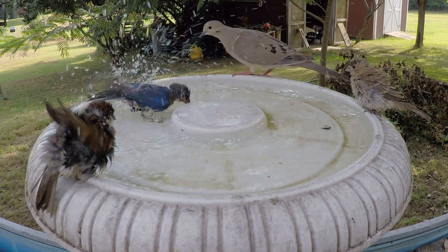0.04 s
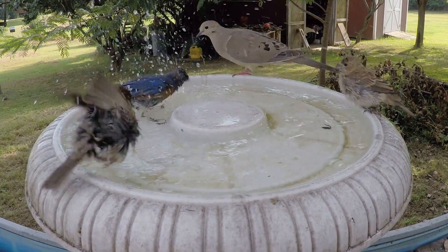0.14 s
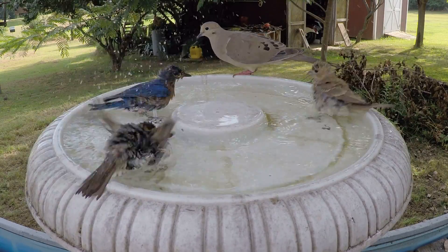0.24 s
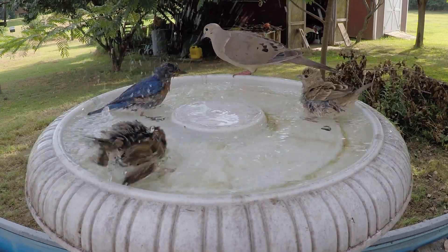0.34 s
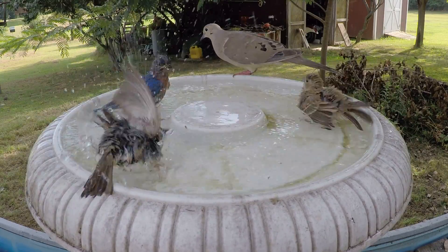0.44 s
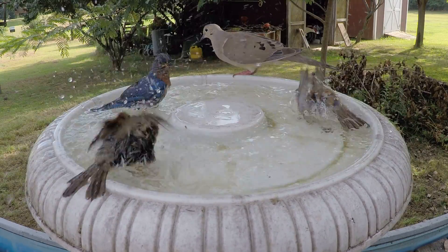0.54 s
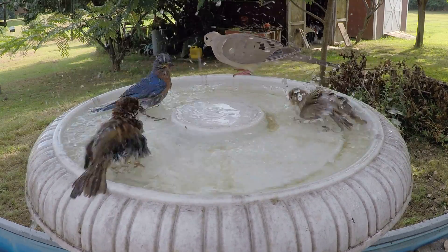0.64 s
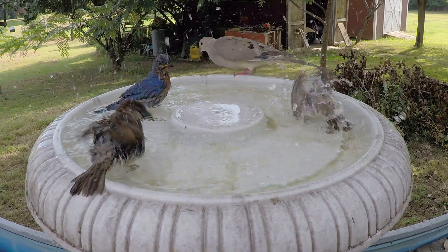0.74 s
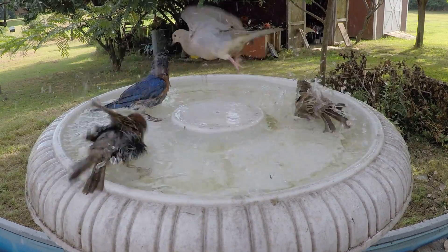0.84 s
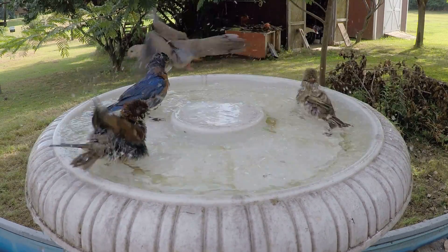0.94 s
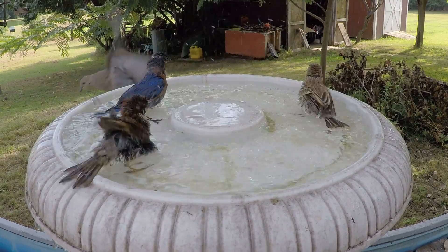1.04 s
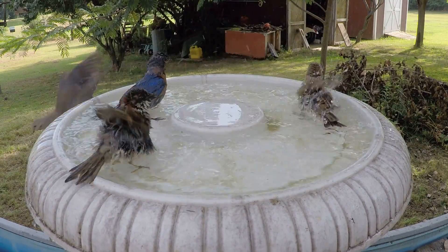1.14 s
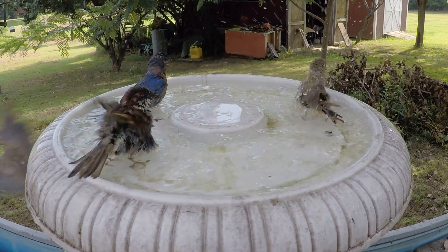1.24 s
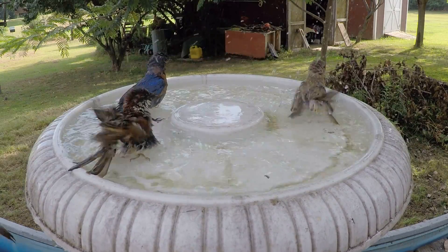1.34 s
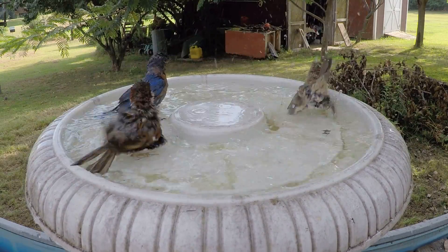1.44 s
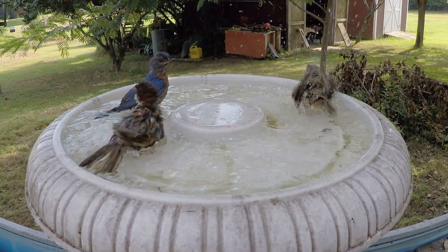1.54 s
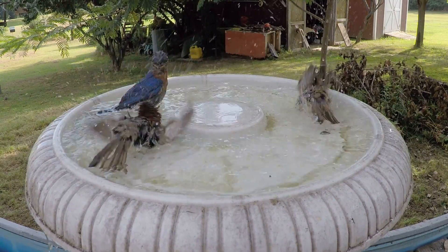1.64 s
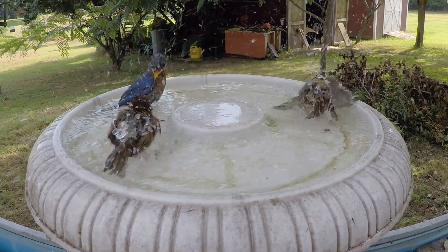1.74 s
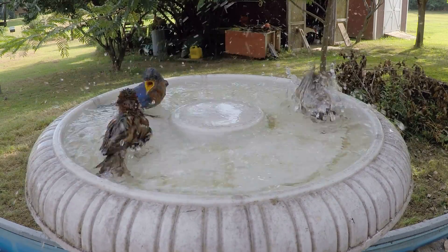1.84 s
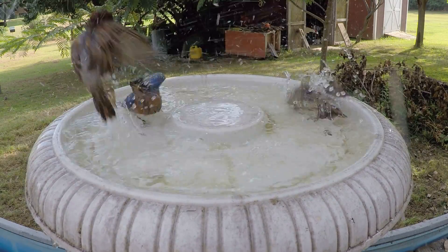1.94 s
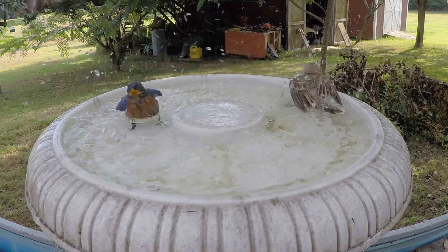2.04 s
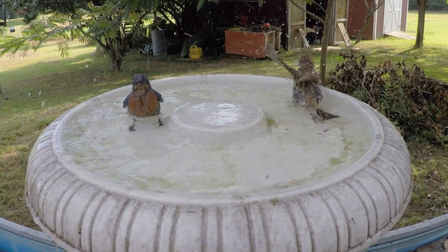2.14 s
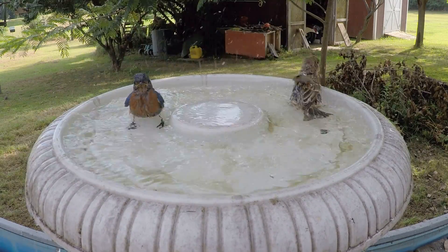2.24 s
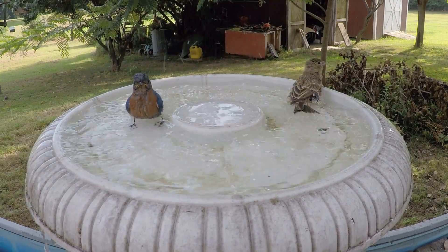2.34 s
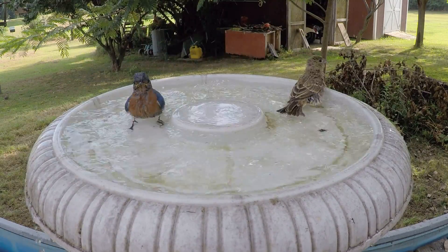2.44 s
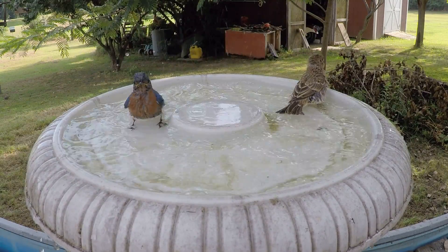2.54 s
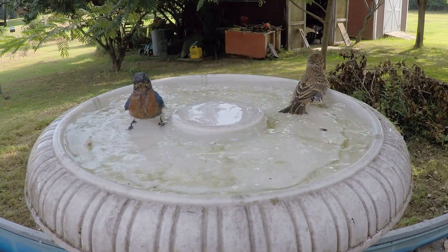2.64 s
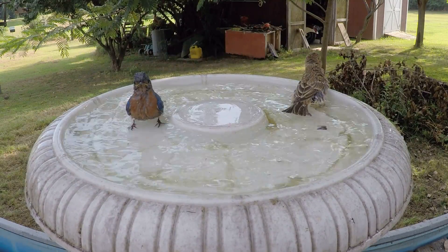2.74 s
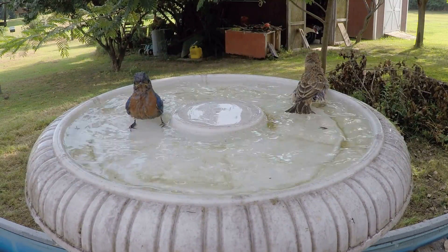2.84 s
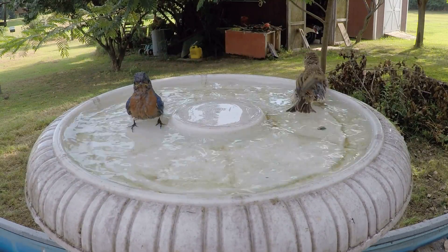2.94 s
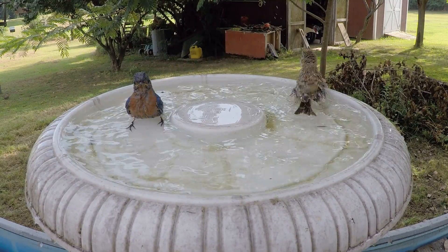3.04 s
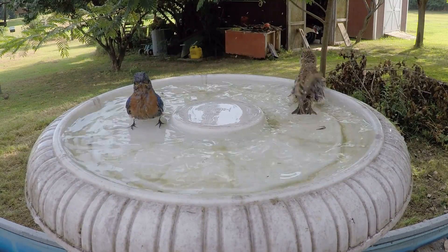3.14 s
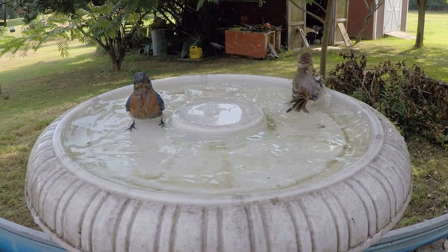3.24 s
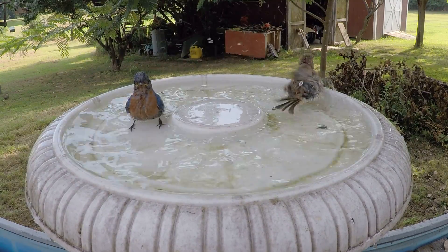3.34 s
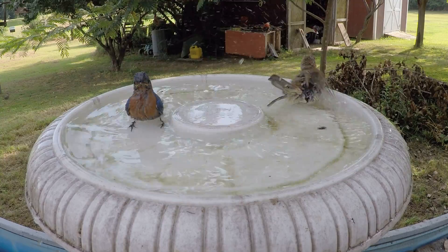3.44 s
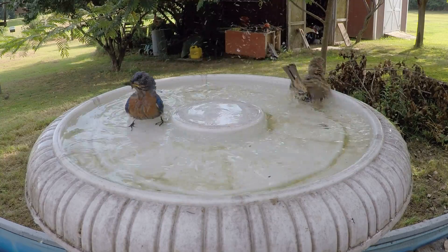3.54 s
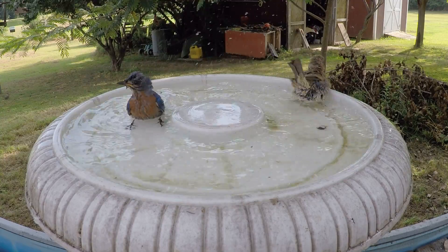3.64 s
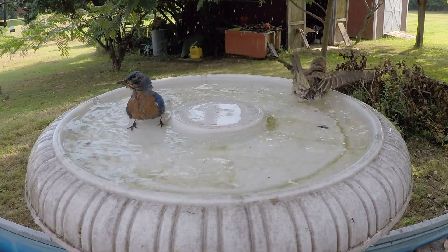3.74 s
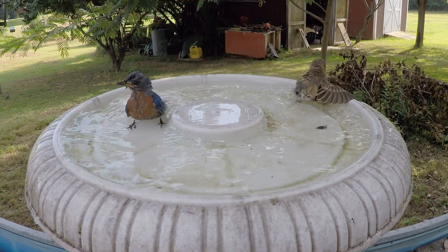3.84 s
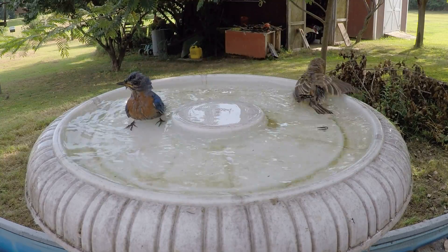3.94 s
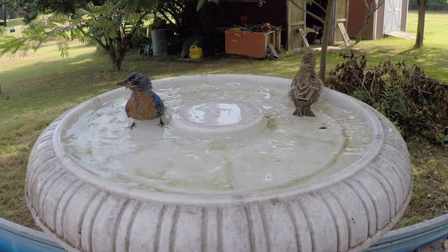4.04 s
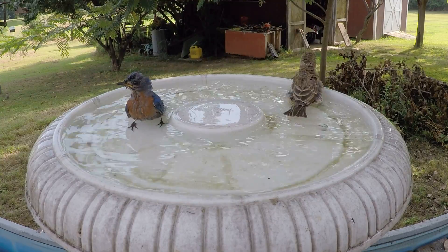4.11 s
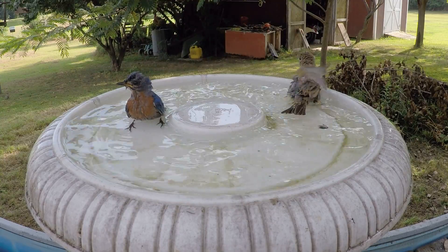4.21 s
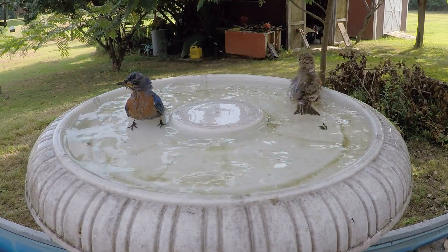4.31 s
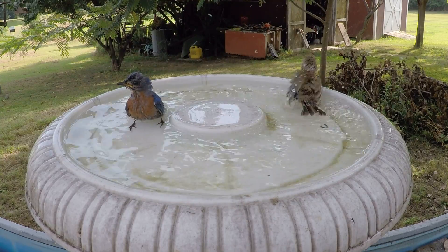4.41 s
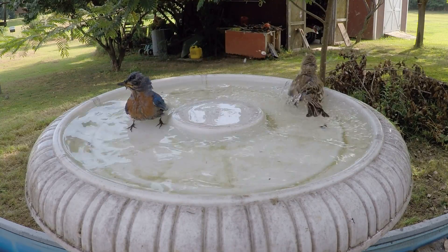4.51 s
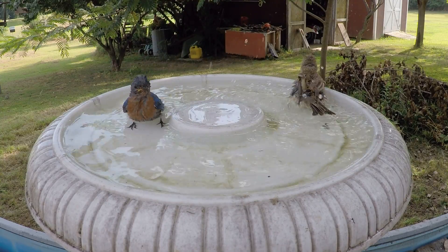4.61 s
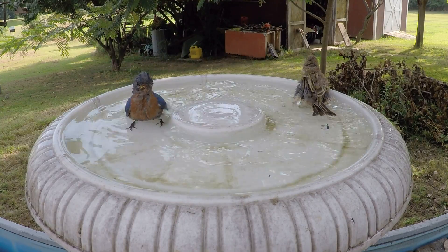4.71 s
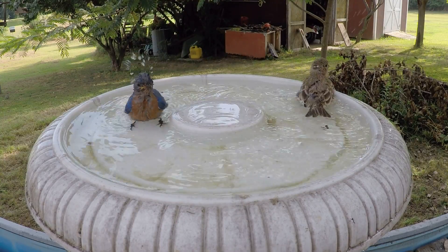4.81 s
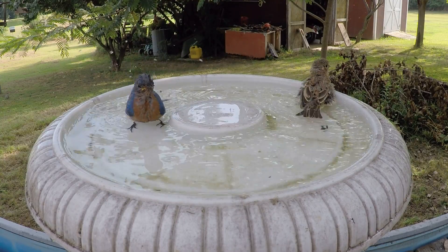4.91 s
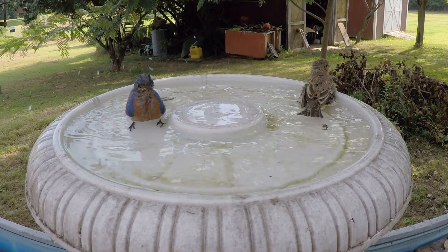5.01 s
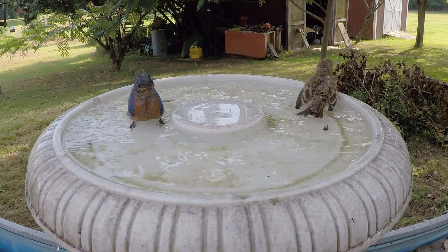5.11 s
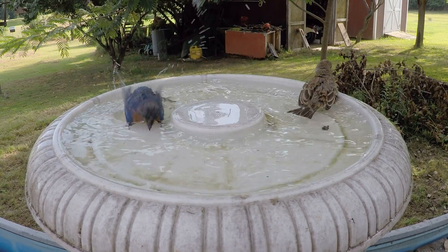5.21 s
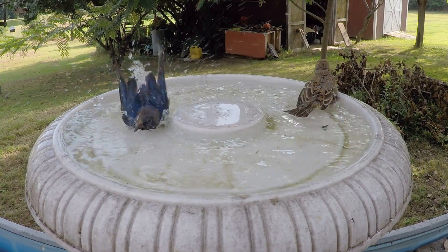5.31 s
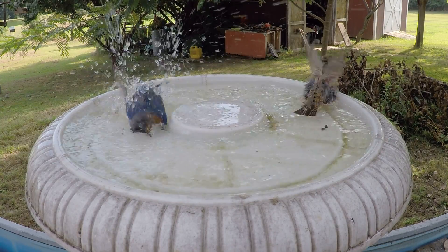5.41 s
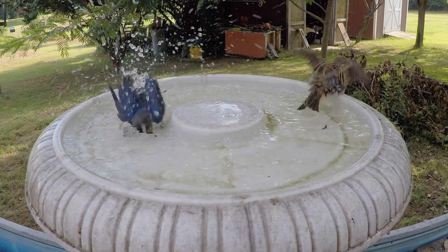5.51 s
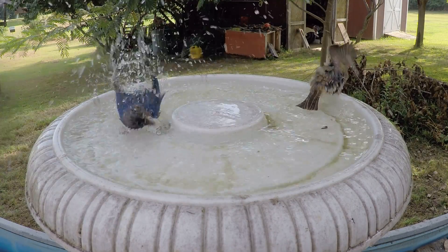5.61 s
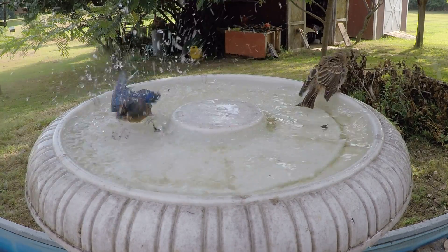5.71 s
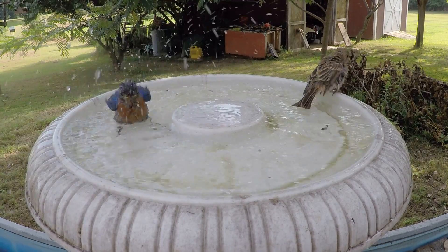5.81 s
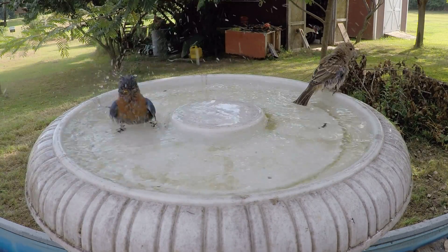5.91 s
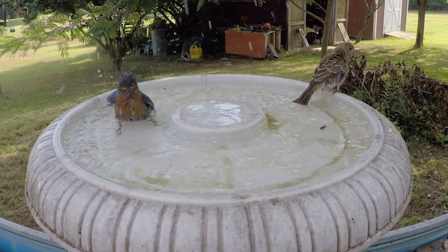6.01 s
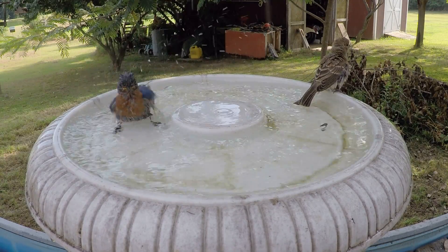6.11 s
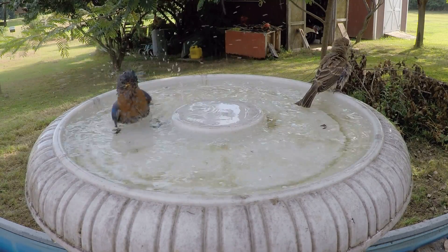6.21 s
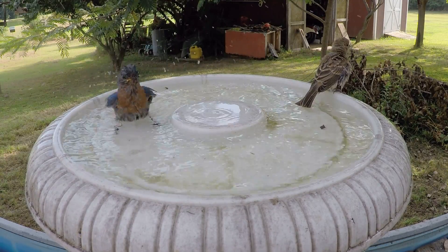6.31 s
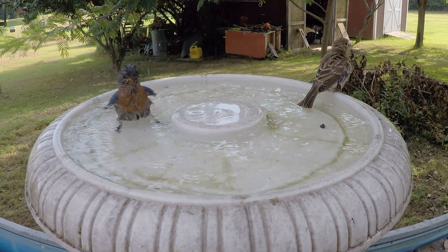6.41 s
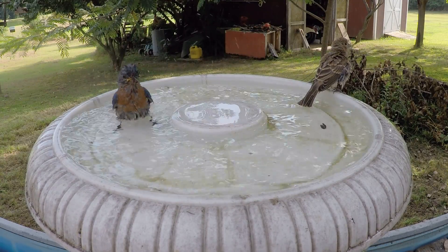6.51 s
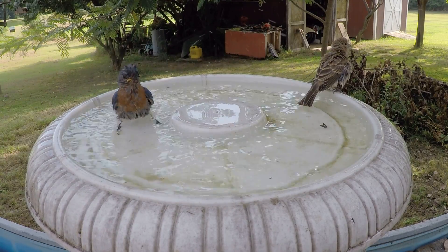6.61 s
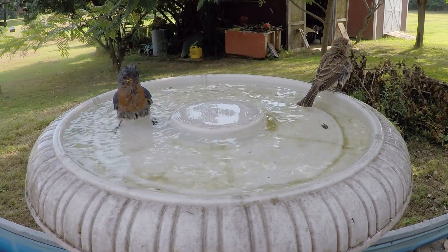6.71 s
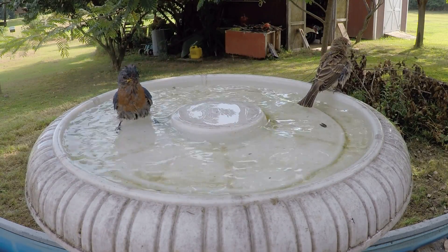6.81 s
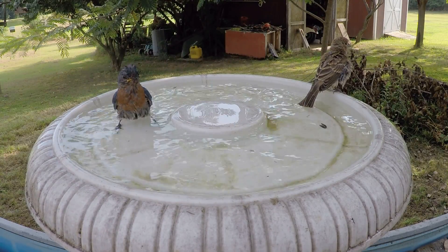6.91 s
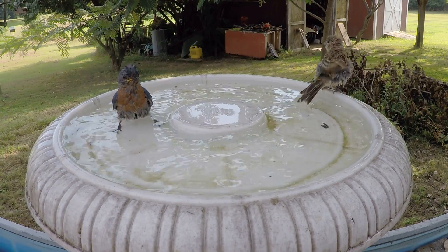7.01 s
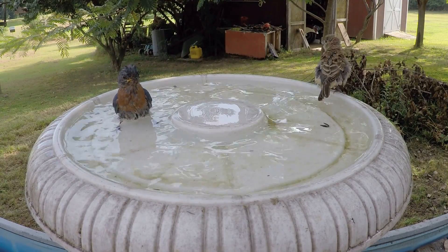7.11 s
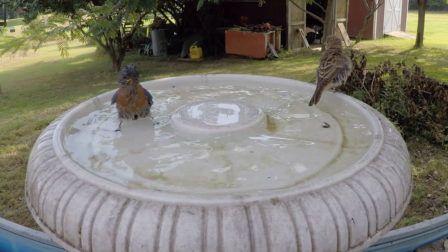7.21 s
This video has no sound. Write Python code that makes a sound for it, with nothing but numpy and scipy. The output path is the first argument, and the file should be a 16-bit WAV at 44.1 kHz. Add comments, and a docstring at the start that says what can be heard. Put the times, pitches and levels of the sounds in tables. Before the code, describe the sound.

Close by a shallow bird bath outdoors, small birds flap in bursts. Drops pelt the microphone housing with hollow knocks and sharp ticks in the first half-second, softer pattering and wing slaps follow, with brisk slaps around two seconds. A quieter middle gives way to another dense splash near five and a half seconds, then stray drips. Low rumble, a soft regular thump, faint hiss and distant chirps lie beneath.

```python
"""Garden bird bath, shallow: small birds bathe, wings slapping and pattering in the water.
Flung drops and mist excite damped modes of the microphone's hollow housing at the rim.
Slaps and falling spray excite basin modes; bubbles are decaying sines that rise in pitch.
Far birds chirp as gliding sines. Shaped-noise rumble and hiss, a wavering drone and a
soft, clock-steady pulse throb with strays lie beneath."""
import sys
import numpy as np
from scipy import signal
from scipy.fft import rfft, irfft
from scipy.io import wavfile

SR = 44100
rng = np.random.default_rng(int(sys.argv[2]) if len(sys.argv) > 2 else 0)


def put_to_file(sound):
    """Save the sound as 16-bit audio at rate SR, in the file named by the first command-line argument."""
    columns = np.atleast_2d(sound).T  # one column per channel
    safe = np.clip(columns, -1, 1)
    whole_steps = np.round(safe * 32767)
    wavfile.write(sys.argv[1], SR, whole_steps.astype(np.int16))


N = 320166
TIME_S = np.arange(N) / SR

# Garden rumble and hiss spectra, relative: freq_hz, density_db_per_hz
RUMBLE_SPECTRUM = [(12, -23), (22, -3.5), (44, 0), (70, -5.5), (110, -13), (160, -18.5), (250, -23),
                   (400, -28), (700, -49), (1500, -53.5)]
HISS_SPECTRUM = [(260, -37), (450, -2.5), (702, -2), (756, -3.5), (958, -4.5), (1780, -7), (2330, -5),
                 (2910, -8), (3630, -5), (4740, -10.5), (5500, -7.5), (6010, -11), (7180, -13.5),
                 (13200, -18), (15500, -23)]
# Low drone swells, before trim and flutter: centre_s, level_db, gaussian_sigma_s
DRONE_SWELLS = [(.05, -62, 0.25), (.54, -54.5, .06), (1.56, -59.5, 0.15), (1.87, -54.5, 0.05),
                (2.38, -55, 0.22), (5.7, -58, 0.16)]
DRONE_REST_DB = -67   # before trim and flutter
THROB_FIRST_S, THROB_PERIOD_S = .0397, .102385
# Far bird chirps: start_s, length_s, start_hz, end_hz, mid_rms_db, buzz_rms_hz
CHIRPS = [(0.925, 0.093, 3200, 3320, -67, 70), (2.43, 0.12, 7400, 7550, -75, 150),
          (2.56, .13, 8550, 8650, -79, 100), (3.437, .07, 7150, 7850, -70, 300),
          (3.851, .16, 3250, 3090, -73, 50), (4.021, 0.14, 2780, 2730, -74, 50),
          (4.2, .12, 2230, 2180, -75, 50), (4.298, .11, 7350, 7160, -74, 300),
          (4.343, 0.0506, 3890, 3350, -65.5, 150), (5.045, 0.057, 7600, 7460, -72, 400),
          (5.179, 0.018, 3450, 3570, -58, 50)]
# Bubbles ringing in the water: start_s, start_hz, peak_db, t60_s
BUBBLES = [(1.072, 910, -51.5, 0.039), (1.218, 1810, -48, 0.12), (1.947, 2070, -43, 0.02),
           (2.41, 1850, -49, 0.058), (2.747, 1610, -40, 0.025), (3.373, 4100, -45, 0.022),
           (6.208, 1690, -46.5, 0.037), (6.75, 2030, -51, 0.018)]
# Wing flutter bouts, levels before trim: start_s, length_s, patter_db, mist_db
FLUTTERS = [(.09, 0.031, -62, -72.5), (0.304, 0.047, -69, -62), (0.498, 0.098, -60, -49),
            (.62, 0.036, -64, -57), (0.75, 1.42, -66.5, -75.5), (2.037, 0.023, -56, -62),
            (2.146, 0.67, -66.5, -69), (3.374, .06, -64.5, -81), (4.35, 0.13, -71, -85),
            (5.22, 0.31, -69.5, -82), (5.489, 0.041, -68, -60.5), (5.596, 0.022, -64, -53),
            (5.668, 0.087, -63, -53), (5.86, 0.093, -73, -60.5), (6.08, 0.13, -67.5, -66.5),
            (6.407, .05, -76, -61), (6.685, .06, -86, -63)]
PATTER_RISE_DB_PER_S, PATTER_FALL_DB_PER_S = 115, 84
MIST_RISE_DB_PER_S, MIST_FALL_DB_PER_S = 258, 260
# Wing slaps and drops in the basin, before trim: start_s, peak_db
SLAPS = [(0.8668, -40), (1.1415, -47), (1.149, -43), (1.2754, -41), (1.2827, -40), (1.367, -45),
         (1.4175, -40.5), (1.467, -45), (1.5186, -44.5), (1.6108, -44), (1.6575, -41.5), (1.998, -30.5),
         (2.0132, -46), (2.0345, -45), (2.0604, -27), (2.1524, -28), (2.6127, -48), (2.63, -42),
         (3.3738, -44.5), (3.554, -45), (4.4742, -51), (4.523, -47)]
# Basin splash resonances, nominal strength: freq_hz, level_db, t60_s
BASIN_MODES = [(750, -21, 0.037), (1690, -9, 0.0062), (2070, -12.5, 0.04), (2410, 0.5, 0.015),
               (2630, -2, 0.0077), (3430, 4.5, 0.0076), (3966, -3, 0.015), (4514, -6, 0.013),
               (5630, -10, 0.019), (6300, -8, 0.0075), (7450, -21.5, 0.0068)]
# Housing modes, nominal strength: freq_hz, level_db, t60_s
HOUSING_MODES = [(464, -17, 0.029), (554, -11, 0.072), (645, -11.5, 0.073), (748, -7, 0.048),
                 (958, -1, 0.024), (1073, -2.5, 0.017), (1224, -2, 0.018), (1366, -5.5, 0.026),
                 (1542, 0, 0.018), (1742, 1, 0.015), (1894, -0.5, 0.028), (2090, -2.5, 0.034),
                 (2200, -6.5, 0.018), (2500, -0.5, 0.012), (2884, -7.5, 0.036), (3354, 3, 0.011),
                 (4050, 0.5, 0.015), (4410, -8, 0.034), (4760, -7, 0.014), (5330, -4.5, 0.0054),
                 (5760, -5, 0.0086), (6440, -6, 0.0072), (7200, -4, 0.0085), (8830, -6, 0.0042),
                 (9800, 0, 0.0037), (10800, 1, 0.0047), (13000, 1, 0.0016)]
# Bounds of the knock, ring, click and spit registers: edge_hz
REGISTER_EDGES_HZ = [400, 1650, 2700, 7000, 16000]
# Drops on the housing: start_s, splat_ms (before offset and stretch), ring_db (rms over 10 ms),
# knock_re_ring_db, force_edge_hz (higher for harder hits)
DROPS = [(.2613, 0.097, -37.5, 1, 3900), (.2865, 1.8, -37.5, -17, 2100), (.304, 0.66, -44.5, -4, 3800),
         (.3599, 3, -56, -8, 2200), (.4196, 1.5, -48, -0.5, 3900), (.4313, 0.67, -49.5, 0, 2000),
         (.4552, 0.33, -37.5, -0.5, 4300), (.479, .1, -45.5, -25, 5900), (.5157, 3.1, -45.5, -13, 3400),
         (.5263, 3.7, -39.5, -18, 3120), (.543, 1.7, -46.5, -4, 3400), (.5566, 3.9, -38.5, -11, 2100),
         (.5731, 1.8, -41, -3.5, 3370), (.5798, 1.8, -40.5, -14, 3300), (.8328, .09, -46.5, -4, 3100),
         (1.0005, 3.5, -53, -3.5, 2200), (1.2154, .1, -40, -1, 2700), (2.284, .2, -52.5, -9, 3020),
         (2.3617, 0.092, -52.5, -7, 3320), (2.4015, 0.23, -51.5, 2.5, 2400), (2.5043, .1, -51, -25, 3700),
         (2.7159, 0.24, -54, -9, 3950), (2.7458, .13, -55.5, -4.5, 3600), (3.4222, 1.2, -54, -9, 2500),
         (5.544, 1.6, -49, -4.5, 2500), (5.5752, .47, -46.5, 1, 8000), (5.589, 1.9, -47, -2, 3200),
         (5.6132, 0.089, -42.5, -5, 10000), (5.6183, 1.8, -51.5, 0.5, 3800), (5.6347, .1, -51.5, -3, 9000),
         (5.658, 0.87, -50.5, 3.5, 2000), (5.6721, 0.86, -42, -0.5, 2000), (5.692, 2.4, -49.5, -2, 6460),
         (5.7226, 7.3, -38, -5, 2400), (5.7342, 3.3, -48, 7, 5000), (5.7397, 0.78, -43, -18, 5460),
         (5.7503, 1.3, -38, -4.5, 2000), (5.7566, 2.3, -42, 3, 6160), (5.7786, 1.1, -45.5, -3.5, 2500),
         (5.821, 2.8, -46, -3.5, 3420), (5.8574, 2.2, -43.5, -1.5, 2680), (5.8707, 0.11, -48, 4.5, 2700),
         (5.9802, .1, -45, -2.5, 4800), (5.992, 0.12, -45, -5, 6300), (6.0414, .1, -52.5, -9, 6900),
         (6.067, .1, -57, 5, 2200), (6.086, 0.12, -49.5, 2.5, 4200), (6.1505, 5.4, -51.5, -6.5, 2900),
         (6.2093, .27, -51, -12, 4530), (6.4143, 1.6, -47, -4, 2700), (6.49, .1, -52.5, -18, 6530),
         (6.541, 1.5, -56, -10, 1800), (6.6992, .36, -55, -3, 3600), (6.7242, 3, -52, -9, 1800),
         (6.8554, .1, -59.5, -11.5, 4800)]
# Upper registers against the ring, before the edge roll-off
CLICK_HZ, CLICK_DB, SPIT_HZ, SPIT_DB = 3960, -2.5, 9900, -5.5
EDGE_DB_PER_OCTAVE = 20.5
CUTOFF_HZ = 15500


def from_db(db):
    """Decibels to gain."""
    return 10 ** (np.asarray(db) / 20)


def rms_one(x):
    """Scale to rms 1."""
    return x / np.sqrt(np.mean(x ** 2) + 1e-20)


def add(out, start_s, sound):
    """Mix a short sound in at start_s."""
    i = max(0, round(start_s * SR))
    out[i:i + len(sound)] += sound[:N - i]


def low_cut(x, cut_hz):
    """Second-order high-pass."""
    return signal.sosfilt(signal.butter(2, cut_hz, "high", fs=SR, output="sos"), x)


def bump(hz, centre_hz, octaves):
    """Bell-shaped weight on the pitch axis."""
    return np.exp(-(np.log2(hz / centre_hz) / octaves) ** 2)


def shaped_noise(spectrum):
    """Noise of rms 1, spectrum interpolated on log frequency."""
    point_hz, point_db = np.transpose(spectrum)
    bins_hz = np.maximum(np.fft.rfftfreq(N, 1 / SR), 1)
    gain = from_db(np.interp(np.log(bins_hz), np.log(point_hz), point_db))
    return rms_one(irfft(rfft(rng.standard_normal(N)) * gain, N))


def drift(corner_hz):
    """Low-passed random variation of rms 1."""
    gain = 1 / (1 + (np.fft.rfftfreq(N, 1 / SR) / corner_hz) ** 4)
    return rms_one(irfft(rfft(rng.standard_normal(N)) * gain, N))


def ring(force, modes, uneven_db=0):
    """A force excites damped modes; uneven_db spreads their strengths, as landing spots do."""
    out = 0
    for k, (hz, db, t60_s) in enumerate(modes):
        radius = np.exp(-np.log(1000) / (t60_s * SR))
        angle = 2 * np.pi * hz / SR
        gain = (-1) ** k * from_db(db + uneven_db * rng.standard_normal())
        poles = [1, -2 * radius * np.cos(angle), radius * radius]
        out = out + gain * signal.lfilter([0, np.sin(angle)], poles, force + 1e-18)
    return out


def splat(length_ms, crack):
    """Force of one drop: a first crack, then a ragged push as it flattens."""
    ms = np.arange(SR // 16) / SR * 1000
    push = rng.standard_normal(len(ms)) * np.exp(-ms / max(length_ms, .05))
    force = rms_one(push) / np.sqrt(len(ms))
    force[0] = crack
    return force


def spray(per_s, spread_db, clump_db):
    """Random droplet impulses, mostly small, arriving in clumps."""
    born = rng.random(N) < per_s * from_db(clump_db * drift(25)) / SR
    sizes = from_db(spread_db * np.minimum(rng.exponential(1, N), 3.5))
    return born * sizes * rng.choice([-1, 1], N)


def flutter_db(column, rise_db_per_s, fall_db_per_s):
    """Each bout builds up, holds while the wings beat, dies away; the loudest bout rules."""
    bouts = []
    for start_s, length_s, *levels_db in FLUTTERS:
        rise_db = rise_db_per_s * np.maximum(start_s - TIME_S, 0)
        fall_db = fall_db_per_s * np.maximum(TIME_S - start_s - length_s, 0)
        bouts.append(levels_db[column] - rise_db - fall_db)
    return np.maximum(np.max(bouts, axis=0), -100)


def patter_level_db():
    """Level of spray falling back into the basin."""
    return flutter_db(0, PATTER_RISE_DB_PER_S, PATTER_FALL_DB_PER_S)


def mist_level_db():
    """Level of mist reaching the housing."""
    return flutter_db(1, MIST_RISE_DB_PER_S, MIST_FALL_DB_PER_S)


def above_edge_db(hz, edge_hz):
    """A drop's force is flat up to its edge and falls steeply above it."""
    return -10 * np.log10(1 + from_db(EDGE_DB_PER_OCTAVE * np.log2(hz / edge_hz)) ** 2)


def drone_gain():
    """Resting drone power plus Gaussian swells, as a gain."""
    power = from_db(DRONE_REST_DB) ** 2
    for centre_s, db, sigma_s in DRONE_SWELLS:
        power = power + (from_db(db) * np.exp(-((TIME_S - centre_s) / sigma_s) ** 2 / 2)) ** 2
    return np.sqrt(power)


def garden(rumble_db=-53.5, swell_db=1.5, drone_hz=99, waver_hz=5.02, hiss_db=-65.83):
    """Uneven noise rumble that swells once, a frequency-wavering sine drone, steady noise hiss."""
    swell = swell_db * np.exp(-((TIME_S - 1.9) / 0.69) ** 2)
    rumble = from_db(rumble_db + swell + 1.07 * drift(13)) * shaped_noise(RUMBLE_SPECTRUM)
    phase = 2 * np.pi * np.cumsum(drone_hz + waver_hz * drift(7.2)) / SR
    drone = drone_gain() * from_db(0.5 + 2.8 * drift(4.1)) * np.sqrt(2) * np.sin(phase)
    hiss = from_db(hiss_db) * shaped_noise(HISS_SPECTRUM)
    return rumble + drone + hiss


def throb(peak_db=-43.0, width_s=0.0018, soft_hz=170, sag_hz=27, damping=0.27,
          stray_per_s=4.5, stray_db=-5.5):
    """Soft periodic electrical pulse with random strays; the input's bass cut makes it swing back."""
    pulse = 1.0 * (TIME_S[:SR // 8] < width_s)
    pulse = signal.sosfilt(signal.butter(1, soft_hz, fs=SR, output="sos"), pulse)
    pulse = signal.sosfilt(signal.butter(2, 520, fs=SR, output="sos"), pulse)
    w = 2 * np.pi * sag_hz
    bass_cut = signal.bilinear([1, 0, 0], [1, 2 * damping * w, w * w], SR)
    pulse = signal.lfilter(*bass_cut, pulse)
    starts = from_db(stray_db) * (rng.random(N) < stray_per_s / SR)
    beats_s = np.arange(THROB_FIRST_S, TIME_S[-1], THROB_PERIOD_S)
    starts[(beats_s * SR).astype(int)] = 1
    return -from_db(peak_db) * signal.fftconvolve(starts, pulse / pulse.max())[:N]


def far_birds():
    """Thin gliding sines; random frequency modulation makes the buzz."""
    out, waver = np.zeros(N), drift(310)
    for start_s, length_s, start_hz, end_hz, db, buzz_hz in CHIRPS:
        n, i = int(length_s * SR), int(start_s * SR)
        hz = np.linspace(start_hz, end_hz, n) + buzz_hz * waver[i:i + n]
        whistle = np.sin(2 * np.pi * np.cumsum(hz) / SR)
        add(out, start_s, from_db(db) * np.sqrt(2 * np.hanning(n)) * whistle)
    return out


def bubbles(rise_per_s=2.1, cycles=45):
    """Trapped bubbles ring down, rising in pitch near the surface; spray churns up more."""
    out, t = np.zeros(N), TIME_S[:SR // 8]
    mist_db = mist_level_db()
    churned = []
    for when, size, strength in rng.random((240, 3)):
        i, hz = int(when * N), 650 * 4 ** size
        churned.append((TIME_S[i], hz, mist_db[i] + 10 * (strength - .5), cycles / hz))
    for start_s, hz, db, t60_s in [*BUBBLES, *churned]:
        phase = 2 * np.pi * hz * t * (1 + rise_per_s * t / 2)
        add(out, start_s, from_db(db - 60 * t / t60_s) * np.sin(phase))
    return out


def basin(slap_trim_db=-0.5, patter_trim_db=0.5, slap_ms=0.79, small_bright=0.65,
          even_db=-38, thin_hz=1350):
    """Wing slaps and falling spray excite the basin modes; small slaps are brighter."""
    patter = rms_one(ring(spray(per_s=400, spread_db=4.5, clump_db=3.8), BASIN_MODES))
    out = from_db(patter_level_db() + patter_trim_db) * patter
    for start_s, db in SLAPS:
        tilt_db_per_octave = small_bright * (even_db - db)
        modes = [(hz, level_db + tilt_db_per_octave * np.log2(max(hz / 2400, 1)), t60_s)
                 for hz, level_db, t60_s in BASIN_MODES]
        sound = low_cut(ring(splat(slap_ms, crack=0.55), modes, uneven_db=5.0), thin_hz)
        add(out, start_s, from_db(db + slap_trim_db) * sound / np.abs(sound).max())
    return out


def housing_mist(trim_db=0.5, treble_db=-5.5, spit_db=-14):
    """Clouds of tiny droplets sizzle on the housing modes."""
    force = spray(per_s=750, spread_db=4.5, clump_db=2.5)
    modes = []
    for hz, db, t60_s in HOUSING_MODES:
        tilt_db = np.interp(hz, [2200, 3200, 7300], [0, treble_db, spit_db])
        modes.append((hz, db + 6 * bump(hz, 2190, 0.14) + tilt_db, t60_s))
    return from_db(mist_level_db() + trim_db) * rms_one(low_cut(ring(force, modes), 432))


def housing_drops(stretches=(.8, 1.1, 1.1, .9), shortest_ms=0.72, crack=1.02, ring_hz=2120,
                  soft_ring_db=15.5, hollow_db=11.5, sharp_db=14.0, sharp_from_hz=4800):
    """Long soft splats wake the hollow lows and 2 kHz ring; hits with a high edge favour the top."""
    out = np.zeros(N)
    for start_s, length_ms, ring_db, knock_db, edge_hz in DROPS:
        click_db = CLICK_DB + above_edge_db(CLICK_HZ, edge_hz)
        spit_db = SPIT_DB + above_edge_db(SPIT_HZ, edge_hz)
        levels_db = ring_db + np.array([knock_db, 0, click_db, spit_db])
        softness = np.clip(length_ms, 0, 1)
        sharpness = np.clip(np.log2(edge_hz / sharp_from_hz), 0, 1)
        woken = [(hz, db + soft_ring_db * softness * bump(hz, ring_hz, 0.08)
                  + hollow_db * (softness - .75) * bump(hz, 638, 0.43)
                  + sharp_db * sharpness * bump(hz, 5600, 1 / 5), t60_s)
                 for hz, db, t60_s in HOUSING_MODES]
        registers = zip(REGISTER_EDGES_HZ, REGISTER_EDGES_HZ[1:], levels_db, stretches)
        for low_hz, high_hz, db, stretch in registers:
            force = splat(stretch * (length_ms + shortest_ms), crack / (1 + length_ms))
            modes = [m for m in woken if low_hz <= m[0] < high_hz]
            sound = low_cut(ring(force, modes, uneven_db=4.5), low_hz * 0.74)
            rms_10ms = np.sqrt(np.sum(sound ** 2) / (SR // 100))   # all energy, as if within 10 ms
            add(out, start_s, from_db(db) * sound / rms_10ms)
    return out


def scene():
    """All layers sum at one microphone."""
    background = garden() + throb() + far_birds()
    water = bubbles() + basin()
    return (background + water + housing_mist() + housing_drops())[None]


def record(dry):
    """Steep elliptic low-pass."""
    return signal.sosfilt(signal.ellip(10, .1, 70, CUTOFF_HZ, fs=SR, output="sos"), dry)


dry = scene()
out = record(dry)
put_to_file(out)
```